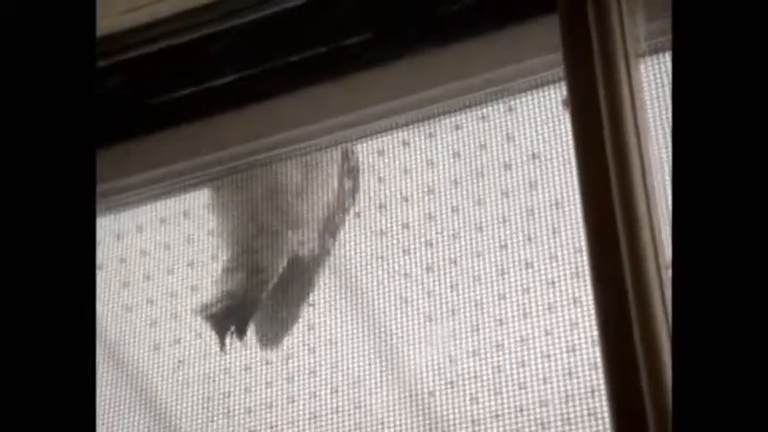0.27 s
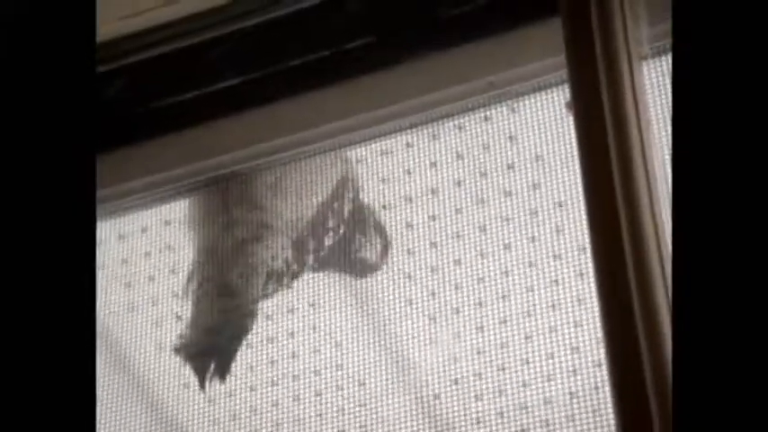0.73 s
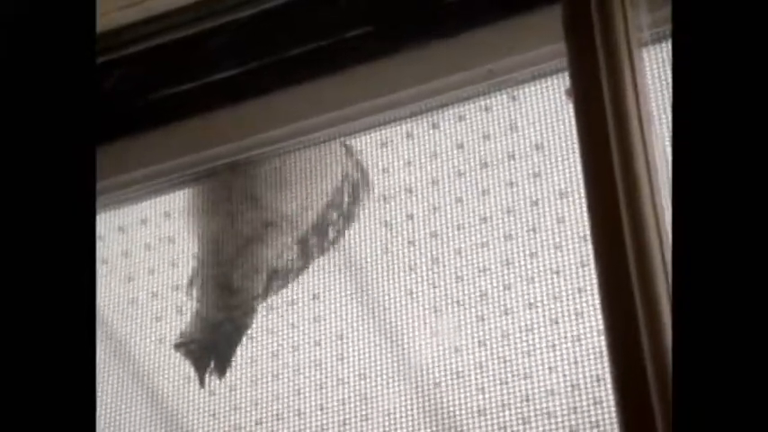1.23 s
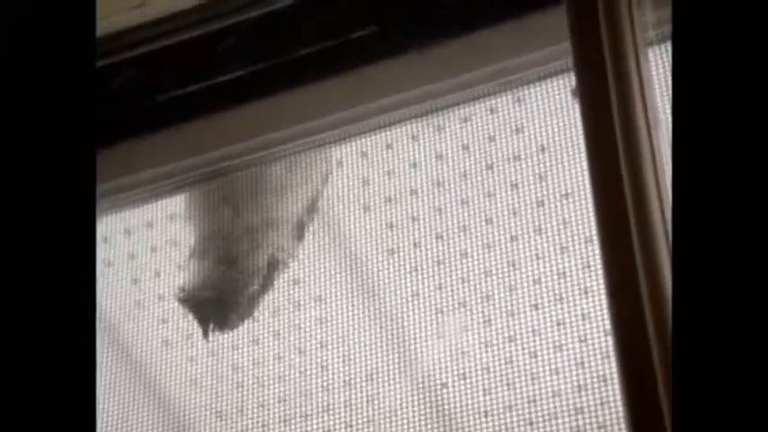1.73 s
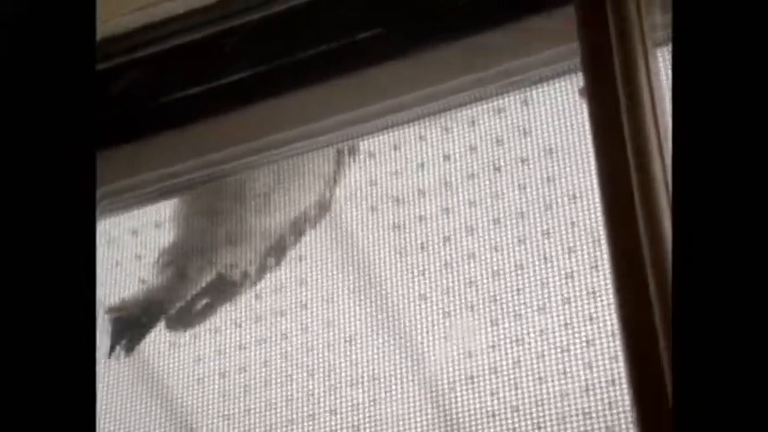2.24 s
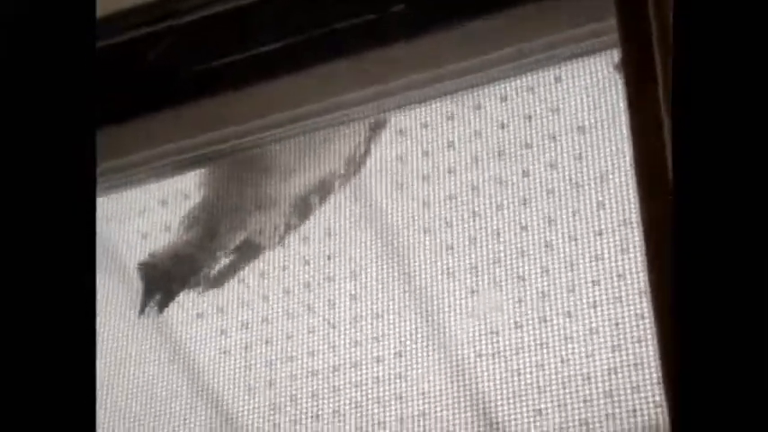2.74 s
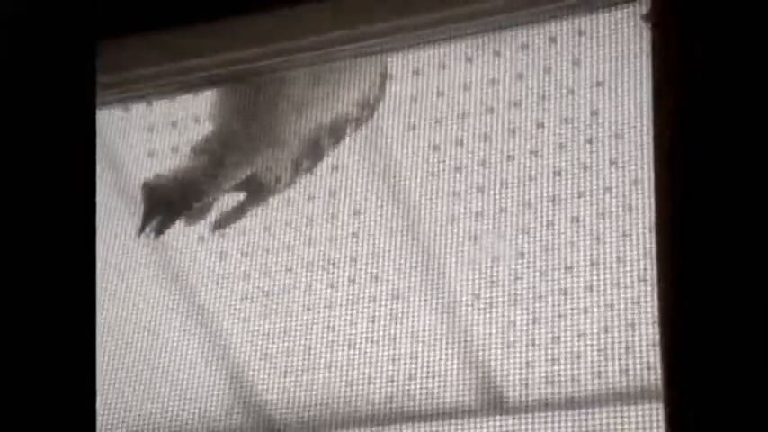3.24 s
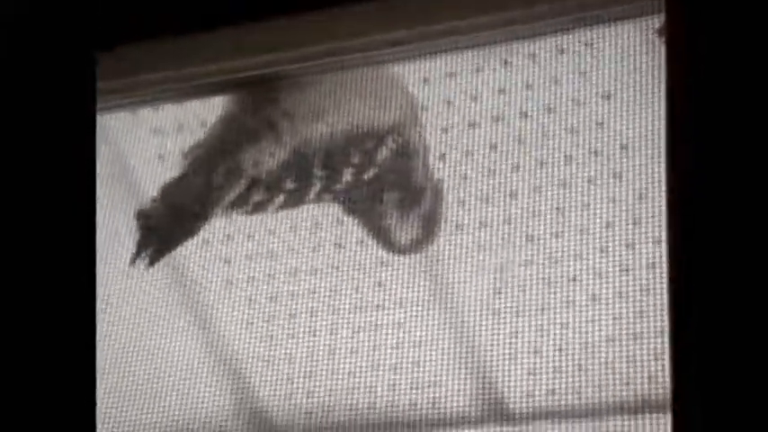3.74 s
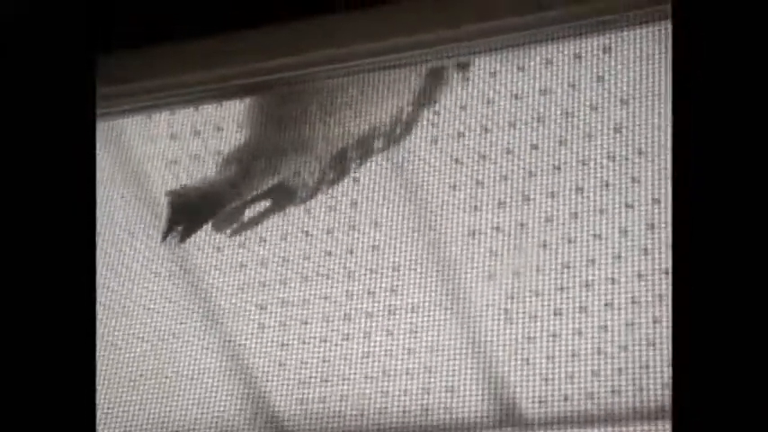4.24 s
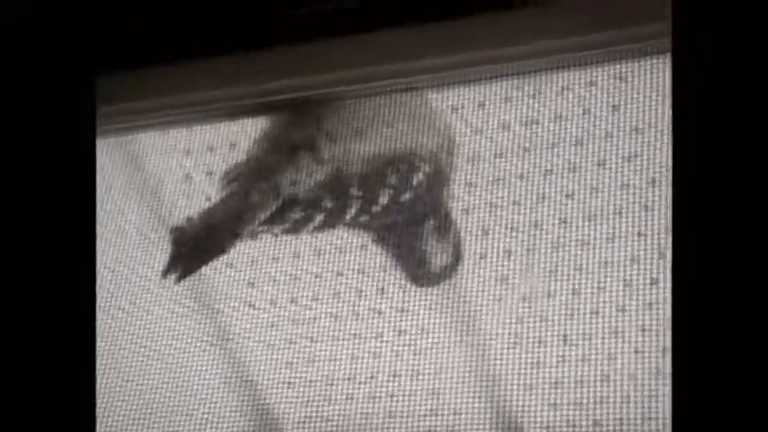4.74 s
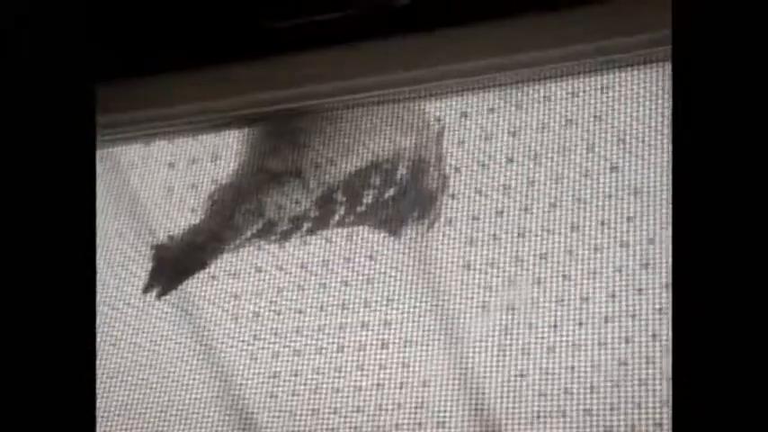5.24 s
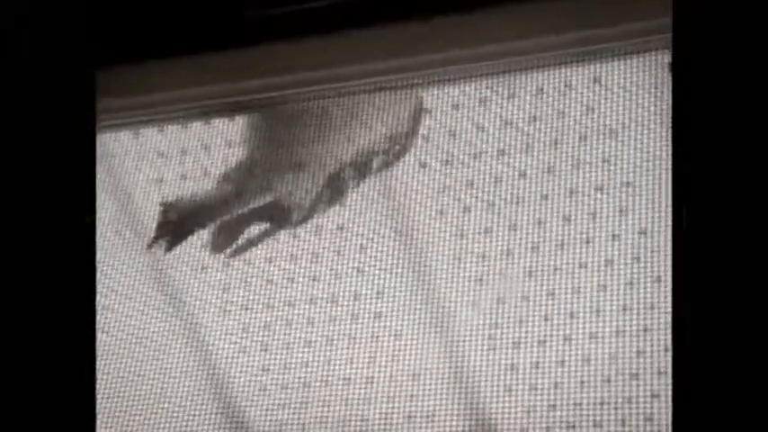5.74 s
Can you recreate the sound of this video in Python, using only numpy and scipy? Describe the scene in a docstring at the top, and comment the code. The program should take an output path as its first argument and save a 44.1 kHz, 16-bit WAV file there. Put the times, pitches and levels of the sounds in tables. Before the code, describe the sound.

A steady low appliance hum with soft fan noise runs throughout, heard indoors with the microphone close to a window pane. In the first 0.3 seconds a woodpecker settles on a dried mud nest outside, with two faint feather brushes and tiny ticks of claws and crumbs. Only the hum follows until a single sharp peck at about 1.6 seconds. Two pecks come around 2 seconds, three quick ones from 2.7 to 2.9, two softer ones near 3.3, and three more from 4.1 to 4.3. After a pause, lighter single pecks land at 5.6 and 5.9 seconds. Each blow is a hard, hollow knock on the wooden frame, far louder than the hum, with a brief ring of glass, a little gritty crunch of mud and a short room tail. Faint claw ticks and falling crumbs sound between the earlier bursts.

```python
"""Indoors at a window, microphone close to the pane, over the low hum and air noise of an appliance.
Just outside, a woodpecker lands on a dried mud nest above the window, feathers brushing the mud,
and pecks it in bursts of one to three blows. Each blow knocks the wooden frame, rings the pane and
crunches the mud; claws and falling crumbs tick faintly in between."""
import sys
import numpy as np
from scipy import signal
from scipy.fft import rfft, irfft, next_fast_len
from scipy.io import wavfile
from scipy.ndimage import map_coordinates

SR = 44100
rng = np.random.default_rng(int(sys.argv[2]) if len(sys.argv) > 2 else 0)


def inscribe(sig):
    """Save sig as 16-bit PCM at rate SR to the path in sys.argv[1].

    A 1-D sig is mono; a 2-D sig holds one channel per row.
    Samples are clipped to [-1, 1] before scaling.
    """
    pcm = np.round(np.clip(np.atleast_2d(sig).T, -1, 1) * 32767)
    wavfile.write(sys.argv[1], SR, pcm.astype(np.int16))


N = 264600
RING = np.arange(SR // 3) / SR  # time since a blow [s]

# the fan's air noise: (frequency [Hz], relative level [dB])
AIR_SPECTRUM = [(20, -12), (40, -14), (85, 0.5), (150, -4.5), (200, 2.5), (280, 5.5), (360, -1), (490, 1.5),
                (600, -1), (1100, -1.5), (1700, -11.5), (2700, -18.5), (5000, -23), (10000, -26)]
# motor tones, close ones beating: (frequency [Hz], rms level [dB], drift width [Hz], noisy share [0-1])
MOTOR_TONES = [(52, -58, 1, 0.07), (59.2, -64.5, 1, .1), (120.1, -57.5, 1.3, 0.27), (204, -53.5, 7.6, 0.94),
               (233.7, -49.5, 0.99, .2), (240.2, -49.5, 1.7, 0.6), (248, -61.5, 3.1, 0.5),
               (271.5, -57.5, 2.2, 0), (412, -64.5, 2, 0.5), (505, -58, 5.2, 0.72)]
# wings and tail brush the nest as the bird settles: (peak time [s], level [dB])
BRUSHES = [(.025, -51), (.175, -51.5)]
# feathers on mud: (frequency [Hz], relative level [dB])
FEATHER_SPECTRUM = [(1000, -32), (3000, -4), (5500, -5), (8000, -5), (9500, -10), (10500, -1.5)]
# crumbs loosened by the landing and the first blows: (start [s], length [s], tick level [dB])
CRUMB_SPILLS = [(.018, .14, -47), (1.639, .04, -50.5), (2.059, .1, -45.5)]
# single claw grips on the nest: (time [s], tick level [dB], tap level [dB])
CLAW_GRIPS = [(.092, -46, -41), (0.124, -43, -44.5), (.232, -49.5, -42.5), (1.548, -47, -66),
              (1.831, -51, -63), (2.622, -47, -41), (3.648, -57, -48)]
# bright tick and duller tap of a claw or crumb: (frequency [Hz], relative level [dB])
TICK_SPECTRUM = [(1000, -24), (3000, -5.5), (5500, 1), (7500, -6.5), (9400, 2), (10500, -11.5)]
TAP_SPECTRUM = [(150, -20.5), (500, -12), (1200, 5.5), (2200, -0.5), (3500, -7.5), (7000, -23.5)]
# beak blows: (time [s], knock [dB], contact hardness [dB], hollow ring [dB], crunch [dB], grit [dB])
BLOWS = [(1.5637, -0.3, 0.5, -13, -38, -44), (1.9135, -1.3, -8, -2.5, -42, -50),
         (2.0197, 4, 0, -6, -25, -32), (2.6761, -1.5, -10.5, 8, -33, -43.5),
         (2.7763, 2.5, 1.5, -6.5, -32.5, -41.5), (2.888, 3.5, 1.5, -3, -18, -26.5),
         (3.258, -8.5, 3.2, 5.5, -35.5, -39), (3.3516, -2.5, -3.5, 3.5, -37, -42),
         (4.0745, -1.3, 0.7, -3.5, -35, -43), (4.1775, -0.5, 3, 2, -27, -40),
         (4.2824, 1.5, 5, 3.5, -27, -26.5), (5.638, -3.5, 5.5, 4, -28, -36),
         (5.9359, -6.5, -1, -3, -43.5, -54)]
# push of the beak, too long a contact to ring the frame in the treble:
# (frequency [Hz], level [dB], share of the hardness [factor], share of the hollow ring [factor])
BEAK_PUSH = [(25, -14.5, 0, 0.11), (90, -0.5, 0, 0.11), (254, 2, 0.21, 0.24), (490, -0.5, 0, -0.023),
             (760, 0.06, 0.54, .1), (1050, -2.5, 0.76, -0.12), (1445, 0, 0.89, 0.99),
             (2250, -4, 1.2, 0.025), (4000, -2.5, 0.79, 0), (9000, -16, 0, 0.18)]
# modes of the wooden frame and of the pane it drives: (frequency [Hz], relative level [dB], t60 [s])
FRAME_MODES = [(164.7, -31, 0.21), (182.8, -18, 0.09), (228, -9.5, 0.021), (292.6, -18.5, 0.072),
               (315.6, -25.5, 0.18), (382, -35, 0.21), (410, -35.5, 0.055), (474.5, -11.5, 0.074),
               (635, -20.5, 0.16), (693.5, -12, 0.05), (771, -13, 0.063), (803, -32.5, 0.34),
               (895, -16.5, 0.022), (995, -22, 0.11), (1031, -22.5, 0.19), (1092, -18, 0.077),
               (1186, -13, 0.05), (1226, -19.5, 0.12), (1336.5, -17, 0.067), (1450, -27, 0.028),
               (1470, -31, 0.098), (1565, -26.5, 0.069), (1726, -23, 0.036), (2163, -18.5, 0.019),
               (2242, -19.5, 0.045), (2328, -23, 0.031)]
PANE_MODES = [(468.8, -11.5, 0.12), (518, -1.5, 0.1), (566.6, 3, 0.086), (659, -4, 0.14), (708, -18, 0.22),
              (860, -8.5, 0.15), (916, -15, 0.14), (1030, -1, 0.114)]
# the frame's crowded upper modes: (frequency [Hz], relative level [dB])
CLATTER_SPECTRUM = [(500, -31.5), (1100, -4.5), (1400, -0.5), (1650, -0.5), (1900, -4.5), (2250, -9.5),
                    (2600, -7.5), (3300, -28), (6000, -51)]
# reflections off near surfaces: (delay [s], gain [factor])
REFLECTIONS = [(.00203, 0.32), (.00852, 0.19), (0.0236, .158)]
# breaking mud and its fine grit: (frequency [Hz], relative level [dB])
CRUNCH_SPECTRUM = [(900, -41), (1700, -9.5), (2200, 6), (2600, 0.5), (2850, -3), (3250, 3.5), (3550, -2.5),
                   (3750, -6), (4050, -1), (4750, -10), (5300, -10.5), (5800, -15), (7000, -36.5),
                   (10000, -56)]
GRIT_SPECTRUM = [(2500, -58), (5000, 3), (6300, 1), (7200, -3.5), (9400, 0), (10500, -4.5)]
# decay of the room around the microphone: (frequency [Hz], t60 [s])
ROOM_DECAY = [(100, 1), (260, 0.29), (800, 0.26), (2000, 0.24), (5000, 0.24), (10000, 0.088)]


def amp(db):
    """Decibels to gain."""
    return 10 ** (np.asarray(db) / 20)


def unit(x):
    """Scale to rms 1."""
    return x / np.sqrt(np.mean(x ** 2) + 1e-20)


def along(points, hz):
    """Read (frequency, value) points on a log frequency axis."""
    freqs, values = np.transpose(points)
    return np.interp(np.log(hz + 1), np.log(freqs + 1), values)


def attack(rise_s):
    """Gain rising from 0 towards 1 with time constant rise_s."""
    return 1 - np.exp(-RING / rise_s)


def fade(t60):
    """Gain of a ring that loses 60 dB in t60 seconds."""
    return amp(-60 * RING / t60)


def filtered(x, response):
    """Filter x by a gain given as a function of frequency."""
    size = next_fast_len(len(x) + SR // 4)
    return irfft(rfft(x, size) * response(np.fft.rfftfreq(size, 1 / SR)), size)[:len(x)]


def noise(spectrum, size):
    """Coloured noise of rms 1."""
    return unit(filtered(rng.standard_normal(size), lambda hz: amp(along(spectrum, hz))))


def add(track, start_s, sound):
    """Mix a sound into the track at start_s."""
    part = track[max(round(start_s * SR), 0):][:len(sound)]
    part += sound[:len(part)]


def appliance():
    """Room tone: a fan's steady air noise and its wavering motor tones."""
    t = np.arange(N) / SR
    out = amp(-44.5) * noise(AIR_SPECTRUM, N)
    for hz, db, width, noisy_share in MOTOR_TONES:
        steady = unit(np.sin(2 * np.pi * (hz * t + rng.random())))
        waver = unit(filtered(rng.standard_normal(N), lambda f: 1 / (1 + ((f - hz) / width) ** 2)))
        out += amp(db) * (np.sqrt(1 - noisy_share) * steady + np.sqrt(noisy_share) * waver)
    return out


def feathers(rise_db_per_s=230, fall_db_per_s=170):
    """Feathers rub on mud: a soft, uneven fizz that swells and dies away with each brush."""
    t = np.arange(N) / SR
    flutter_db = 2.9 * map_coordinates(rng.standard_normal(N // 100), [t * 90], order=1)  # 90 values/s
    swells = sum(amp(db - np.maximum(rise_db_per_s * (peak_s - t), fall_db_per_s * (t - peak_s)))
                 for peak_s, db in BRUSHES)
    return swells * amp(flutter_db) * noise(FEATHER_SPECTRUM, N)


def crumbs(gap_s=0.022, jitter_s=0.003, fade_db_per_s=34, scatter_db=1, tap_below_db=4):
    """Each spill is a fading run of uneven crumbs: rows of (time [s], tick [dB], tap [dB])."""
    rows = []
    for start, length, db in CRUMB_SPILLS:
        chance = rng.standard_normal((32, 2))
        for age, (late, small) in zip(np.arange(0, length, gap_s), chance):
            tick_db = db - fade_db_per_s * age - scatter_db * small
            rows.append((start + age + jitter_s * late, tick_db, tick_db - tap_below_db))
    return rows


def mud_burst(spectrum, rise_s, t60, tail_db, tail_t60):
    """Breaking mud: a quick spray of noise, then a weaker trickle."""
    envelope = attack(rise_s) * (fade(t60) + amp(tail_db) * fade(tail_t60))
    return noise(spectrum, len(RING)) * envelope / envelope.max()


def claws_and_crumbs():
    """Claws catch and crumbs fall: each a dry tick with a small tap."""
    track = np.zeros(N)
    for start, tick_db, tap_db in [*CLAW_GRIPS, *crumbs()]:
        tick = mud_burst(TICK_SPECTRUM, rise_s=0.00092, t60=0.029, tail_db=-30, tail_t60=0.2)
        tap = mud_burst(TAP_SPECTRUM, rise_s=0.0018, t60=0.065, tail_db=-22, tail_t60=0.19)
        add(track, start, amp(tick_db) * tick + amp(tap_db) * tap)
    return track


def beak_contact(hard_db, hollow_db, size=4096):
    """The beak's push: a hard contact is brighter, a hollow spot rings in the midrange."""
    hz, push_db, hard_share, hollow_share = np.transpose(BEAK_PUSH)
    spectrum = np.column_stack([hz, push_db + hard_share * hard_db + hollow_share * hollow_db])
    cepstrum = irfft(np.log(amp(along(spectrum, np.fft.rfftfreq(size, 1 / SR)))))
    # minimum phase: the shortest causal push with this spectrum
    cepstrum[1:size // 2] *= 2
    cepstrum[size // 2 + 1:] = 0
    return irfft(np.exp(rfft(cepstrum)))


def ringing(modes, scatter_db):
    """Damped modes, struck a little differently each time; neighbours swing in opposite directions."""
    gains = amp(scatter_db * rng.standard_normal(len(modes))) * (-1) ** np.arange(len(modes))
    return sum(gain * amp(db) * fade(t60) * np.sin(2 * np.pi * hz * RING)
               for gain, (hz, db, t60) in zip(gains, modes))


def window():
    """Heard close up, the frame answers at once, the pane swells after it; near surfaces repeat both."""
    frame = ringing(FRAME_MODES, scatter_db=0.62) * attack(0.00044)
    pane = ringing(PANE_MODES, scatter_db=0.9) * attack(0.042) ** 2
    clatter = amp(-23.5) * noise(CLATTER_SPECTRUM, len(RING)) * fade(0.099) * attack(0.0028)
    out = frame + pane + clatter
    for delay, gain in REFLECTIONS:
        add(out, delay, gain * (frame + pane))
    return out


def pecks():
    """Every blow on the nest rings the same window and breaks a little mud."""
    track = np.zeros(N)
    for start, knock_db, hard_db, hollow_db, crunch_db, grit_db in BLOWS:
        knock = signal.fftconvolve(window(), beak_contact(hard_db, hollow_db))[:len(RING)]
        crunch = mud_burst(CRUNCH_SPECTRUM, rise_s=0.0022, t60=0.045, tail_db=-31, tail_t60=0.088)
        grit = mud_burst(GRIT_SPECTRUM, rise_s=0.0019, t60=0.026, tail_db=-46, tail_t60=0.13)
        blow = amp(knock_db) * knock + amp(crunch_db) * crunch + amp(grit_db) * grit
        add(track, start, room(blow, wet_db=-18.5))
    return track


def room(direct, wet_db):
    """The room around the microphone adds a short diffuse tail, longest in the bass."""
    hz, t, bands = signal.stft(rng.standard_normal(len(RING)), SR, nperseg=256)
    decay = amp(-60 * t / along(ROOM_DECAY, hz)[:, None])
    tail = signal.istft(bands * decay, SR, nperseg=256)[1][:len(RING)] * attack(0.02)
    reverb = signal.fftconvolve(direct, tail / np.linalg.norm(tail))[:len(direct)]
    return direct + amp(wet_db) * reverb


def scene():
    """The bird outside the pane and the hum inside, in mono."""
    return (pecks() + claws_and_crumbs() + feathers() + appliance())[None]


def record(dry):
    """The microphone rounds off the hardest blows; the top end is cut steeply."""
    ceiling, knee_power, cutoff_hz = 0.72, 6, 10050
    rounded = dry[0] / (1 + np.abs(dry[0] / ceiling) ** knee_power) ** (1 / knee_power)
    return filtered(rounded, lambda hz: 1 / (1 + (hz / cutoff_hz) ** 160))[None]


dry = scene()
out = record(dry)
inscribe(out)
```